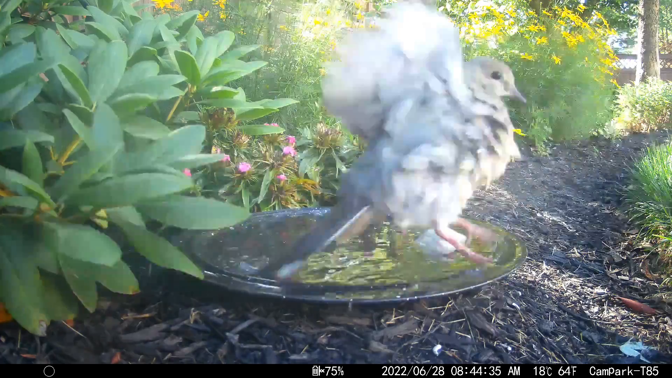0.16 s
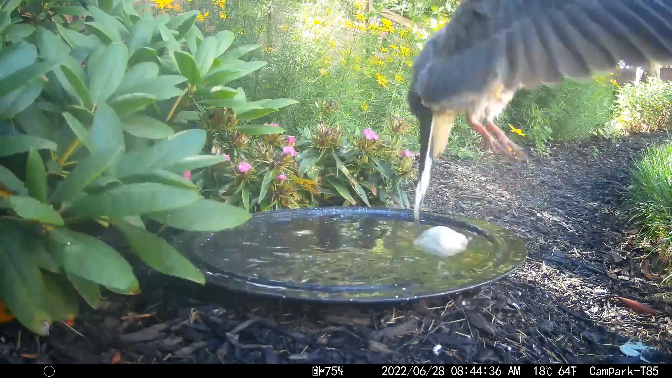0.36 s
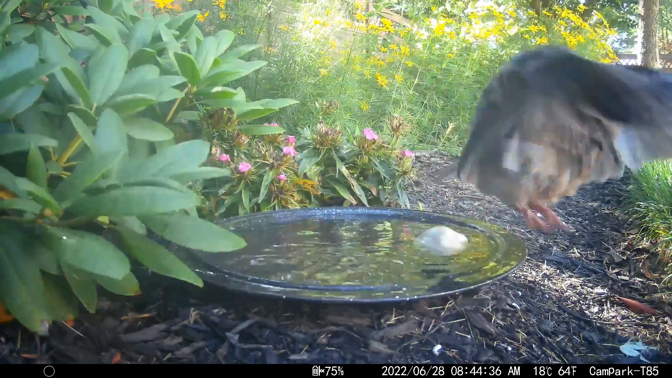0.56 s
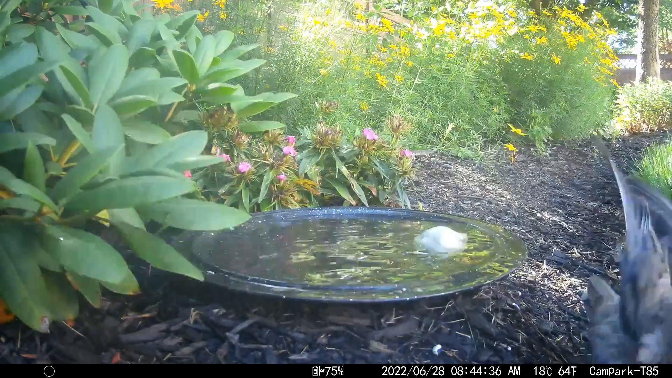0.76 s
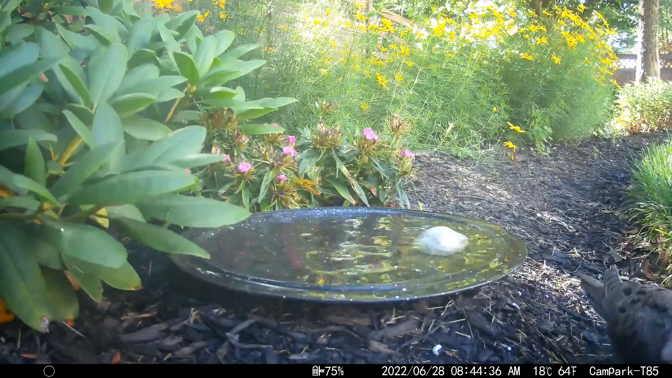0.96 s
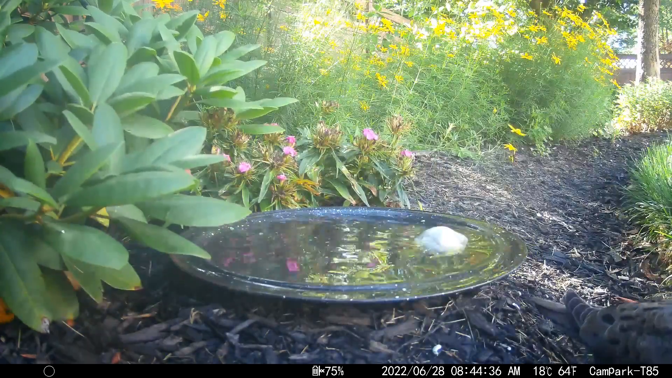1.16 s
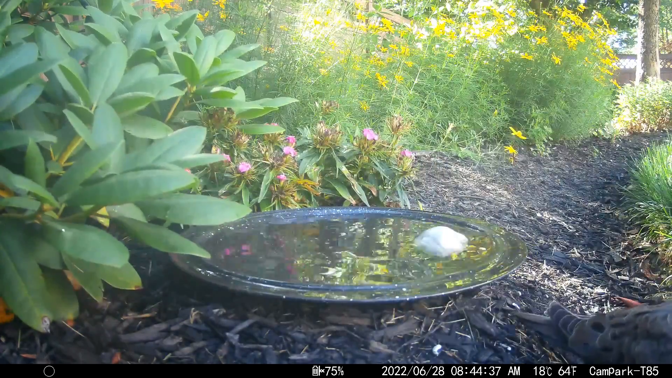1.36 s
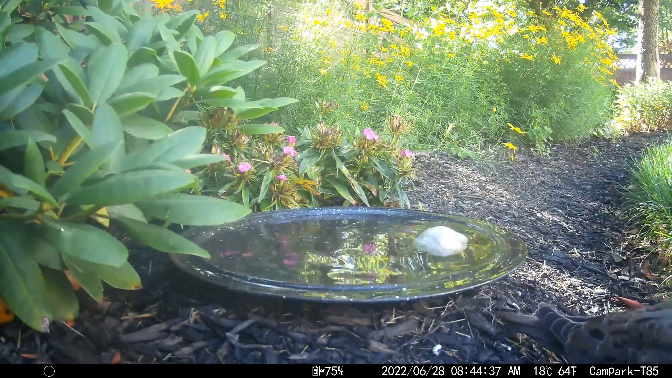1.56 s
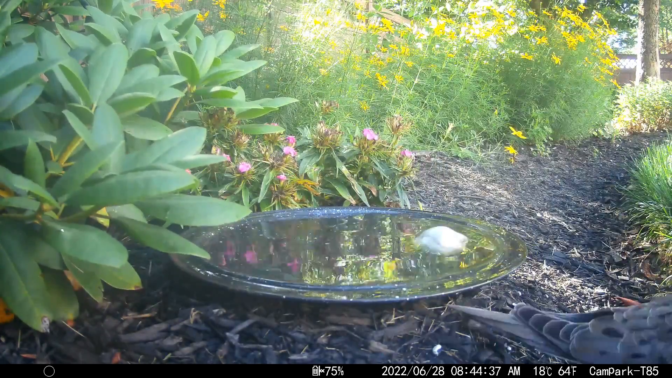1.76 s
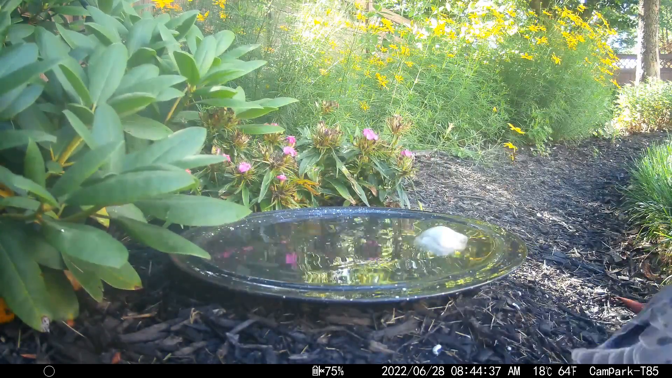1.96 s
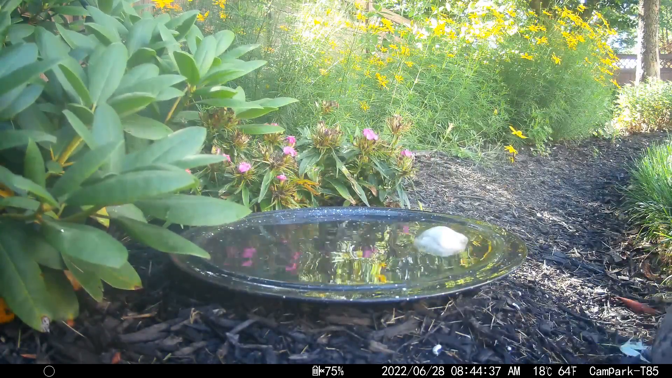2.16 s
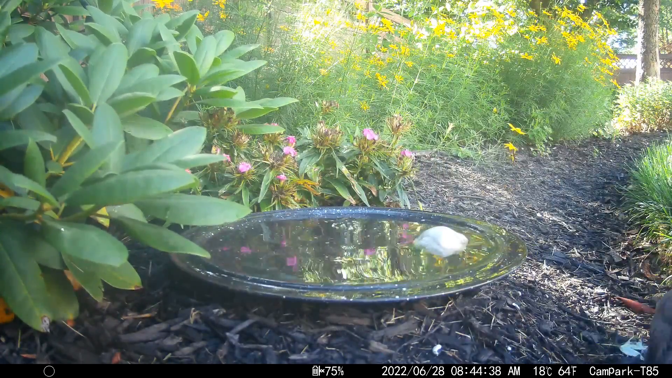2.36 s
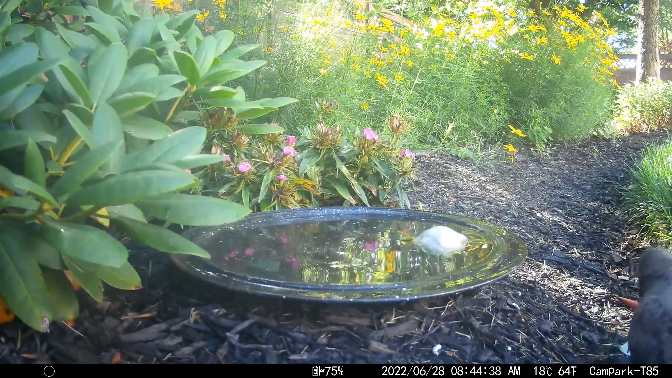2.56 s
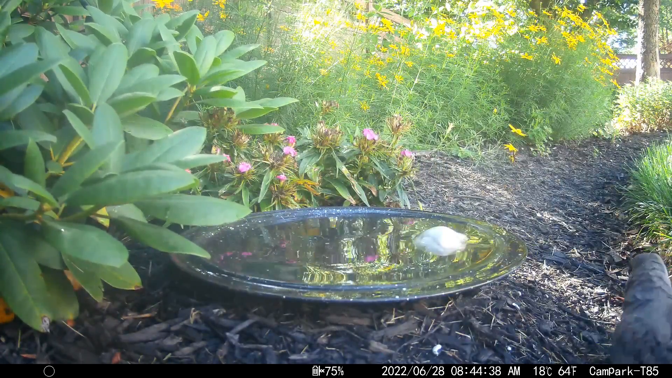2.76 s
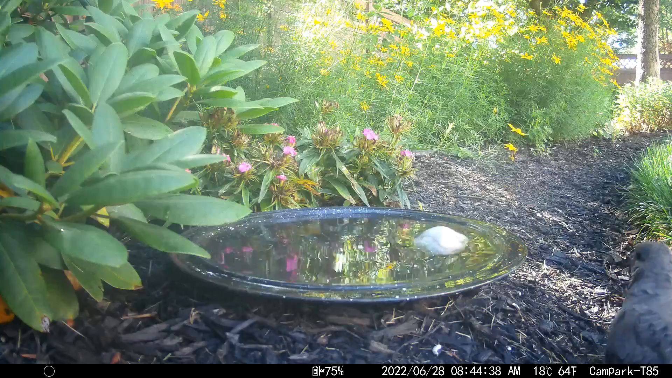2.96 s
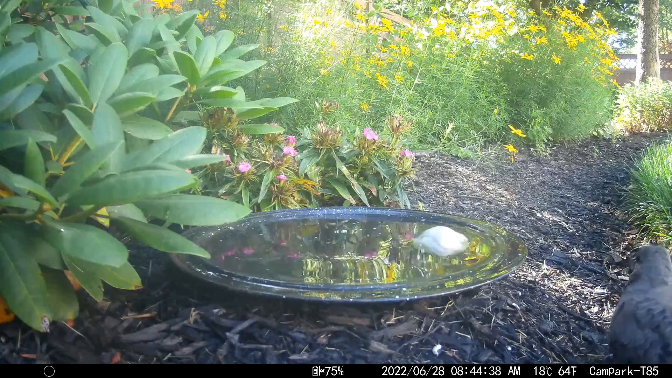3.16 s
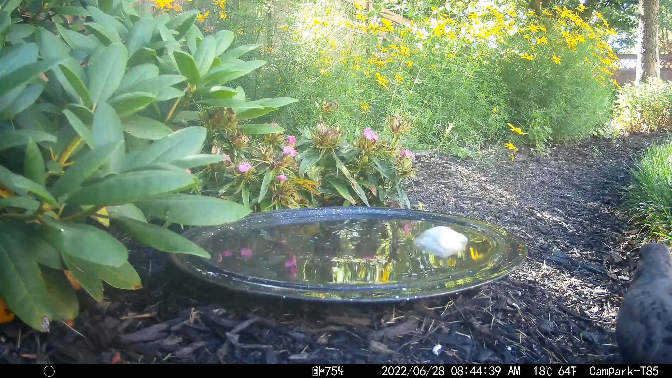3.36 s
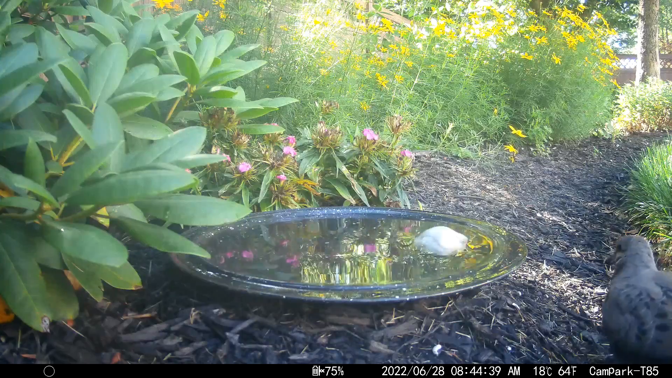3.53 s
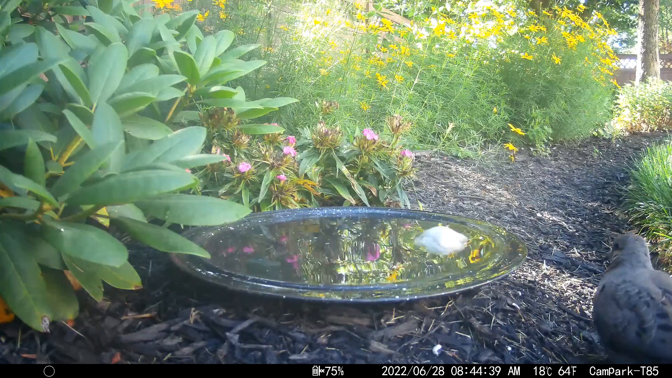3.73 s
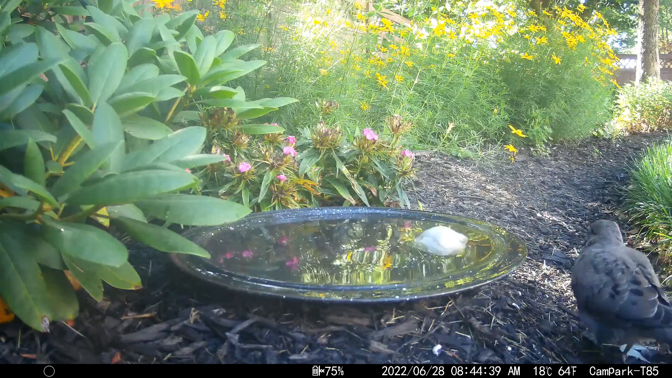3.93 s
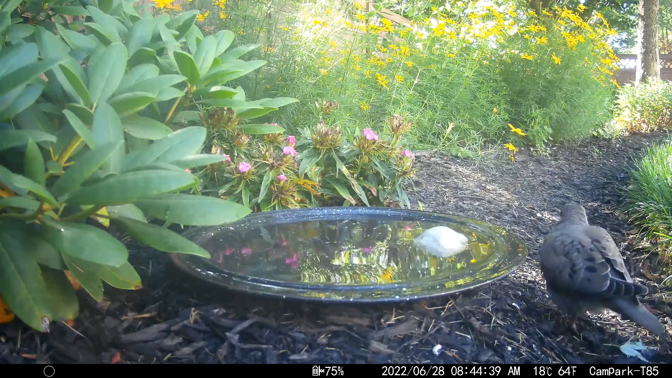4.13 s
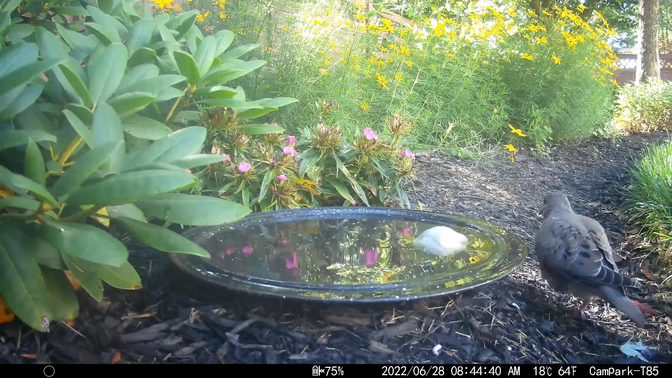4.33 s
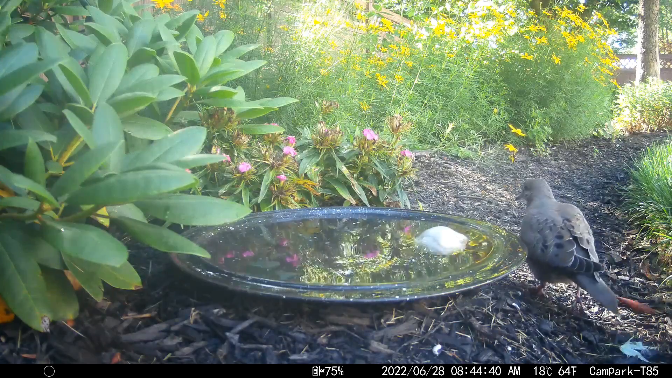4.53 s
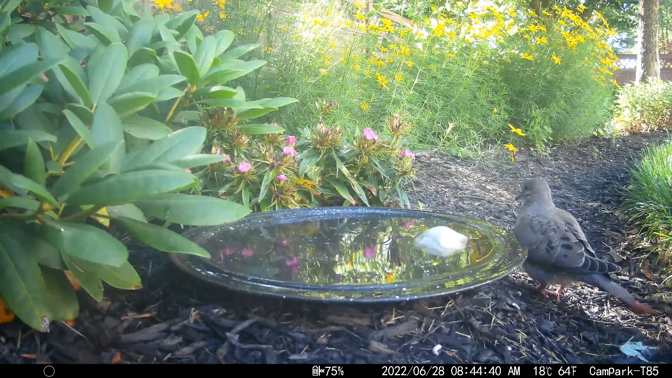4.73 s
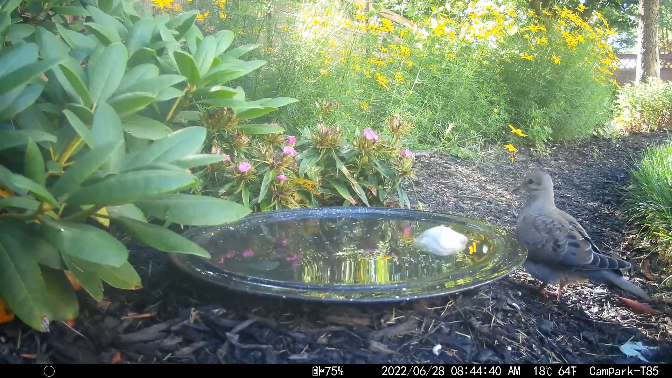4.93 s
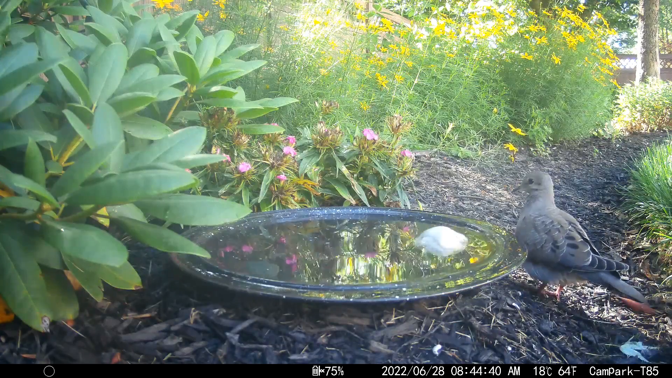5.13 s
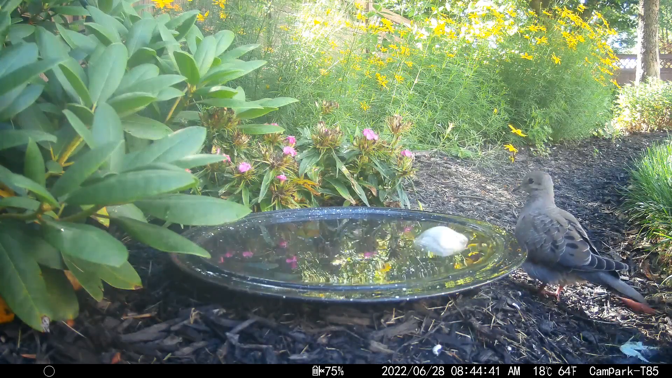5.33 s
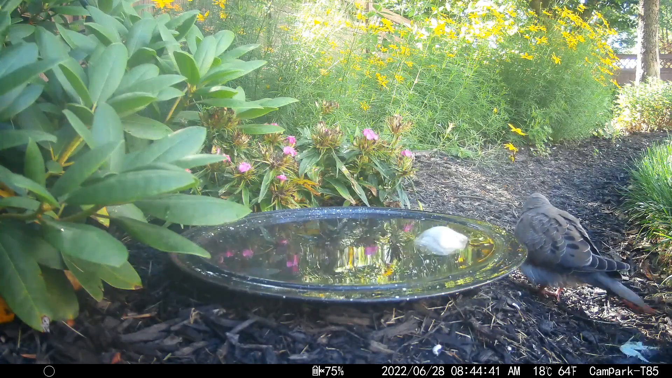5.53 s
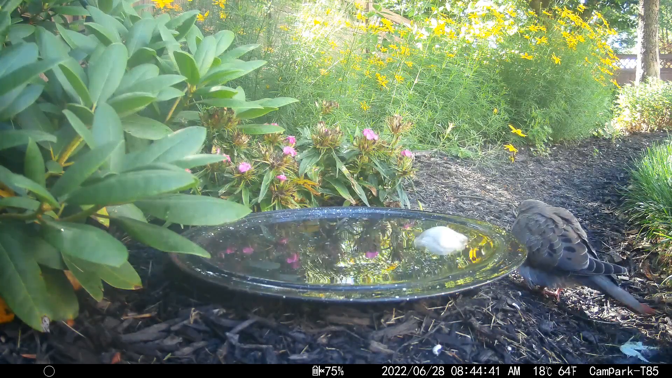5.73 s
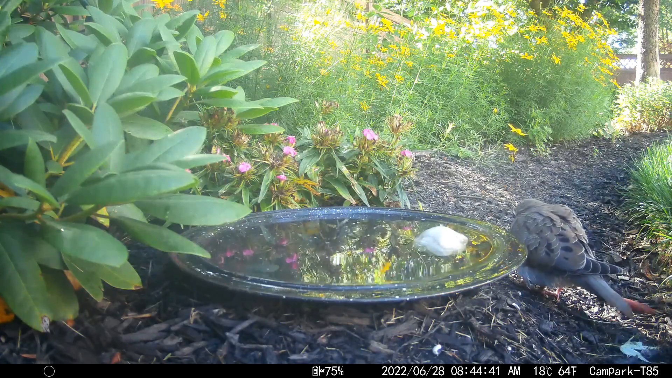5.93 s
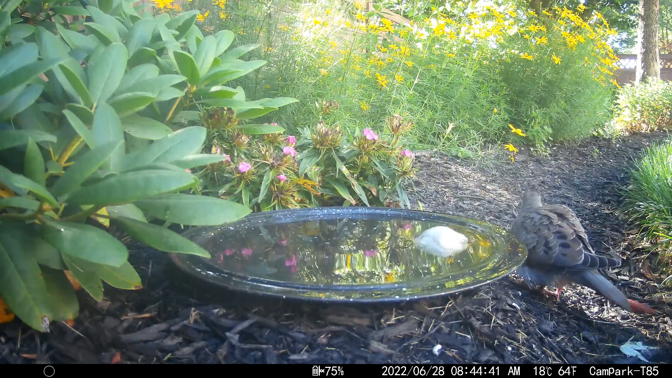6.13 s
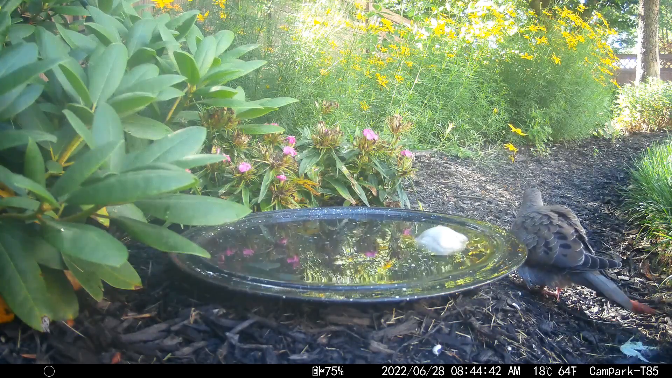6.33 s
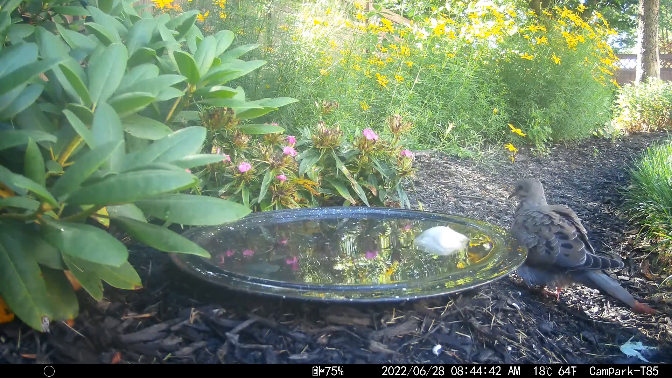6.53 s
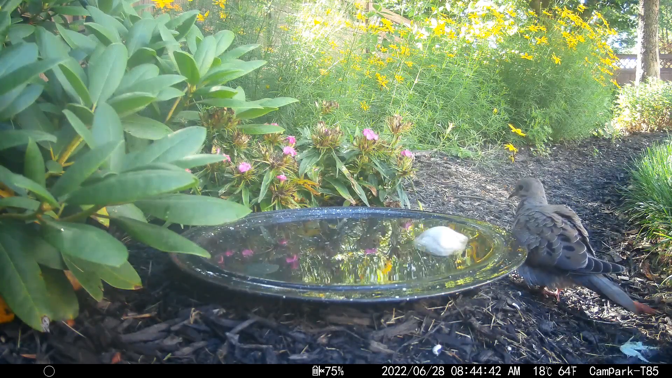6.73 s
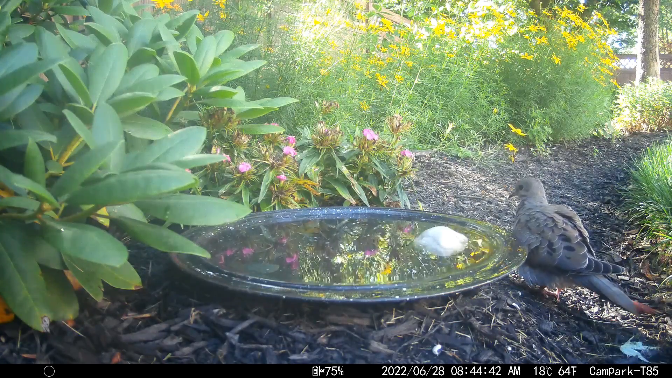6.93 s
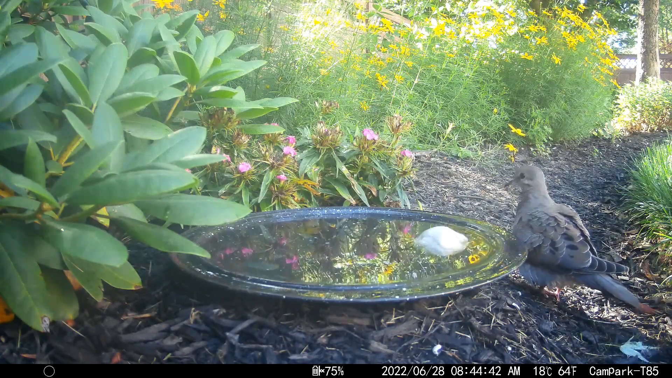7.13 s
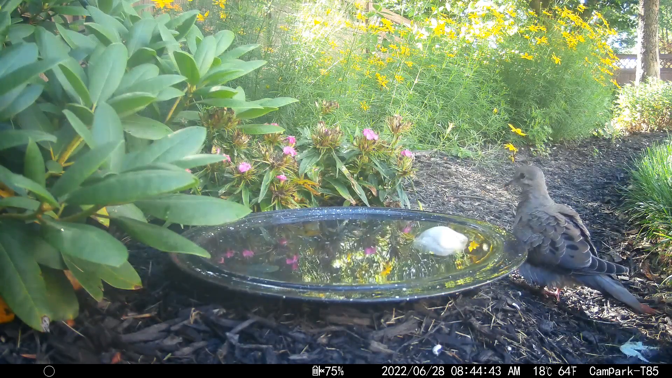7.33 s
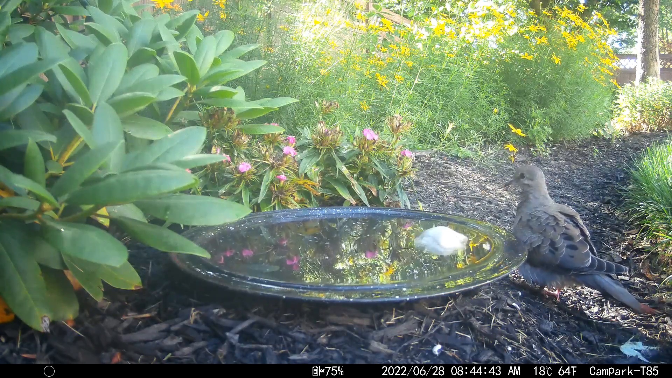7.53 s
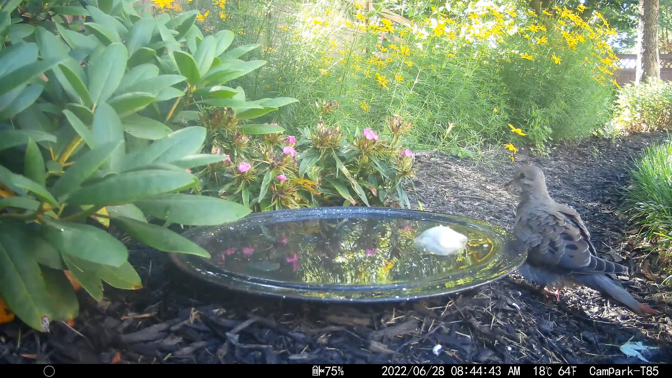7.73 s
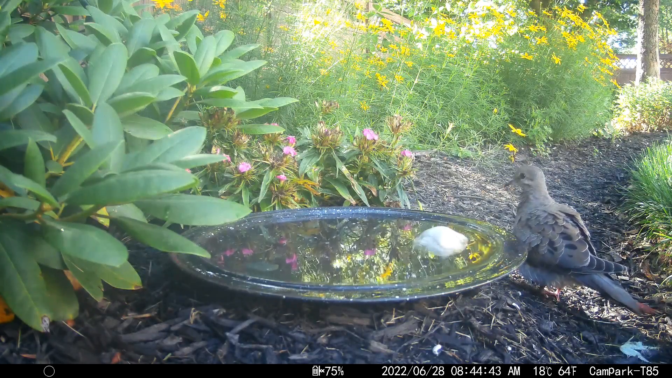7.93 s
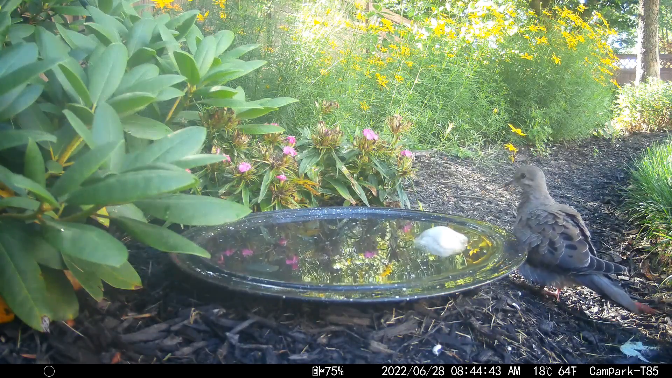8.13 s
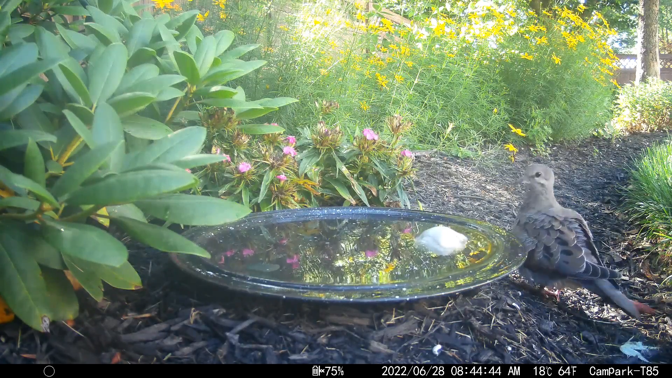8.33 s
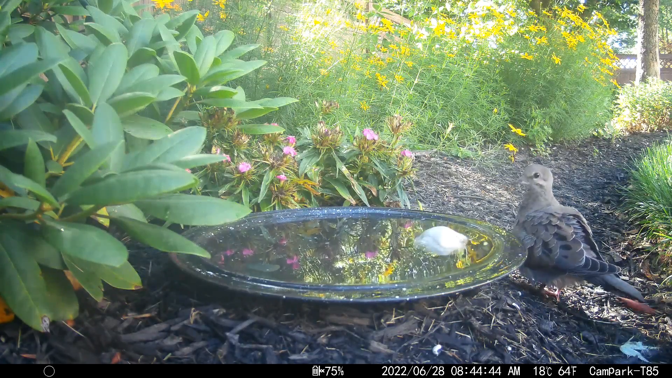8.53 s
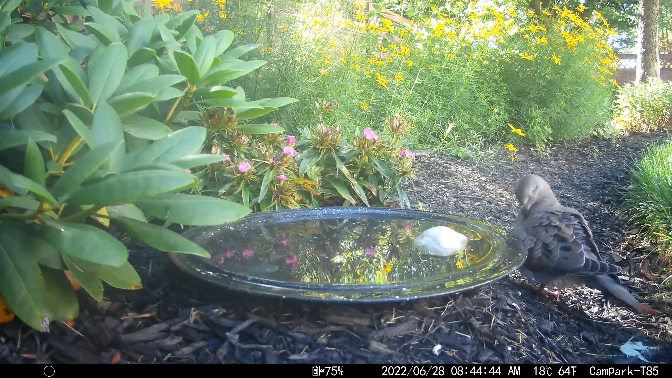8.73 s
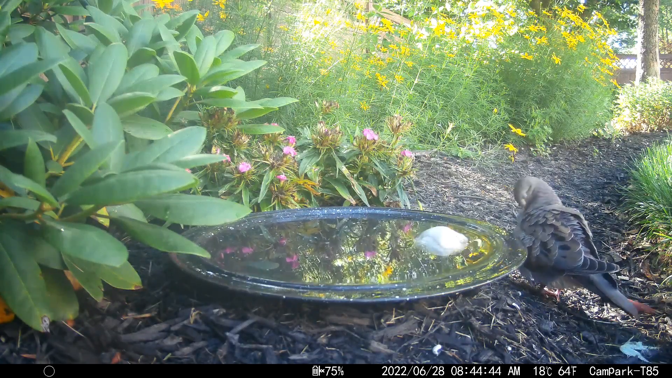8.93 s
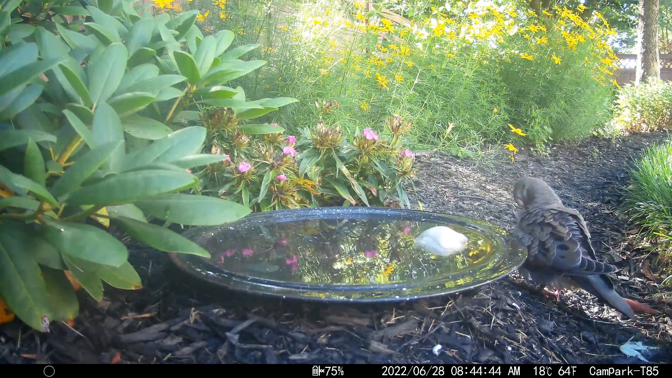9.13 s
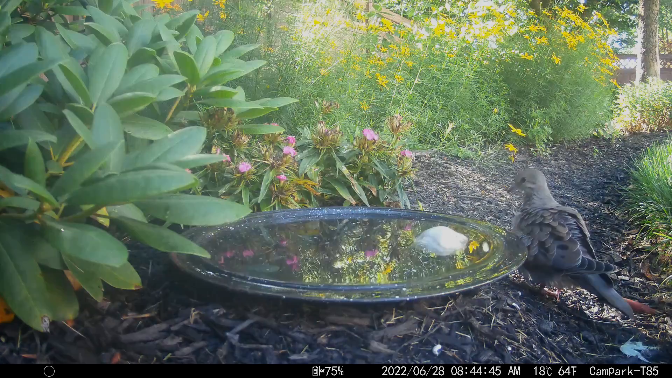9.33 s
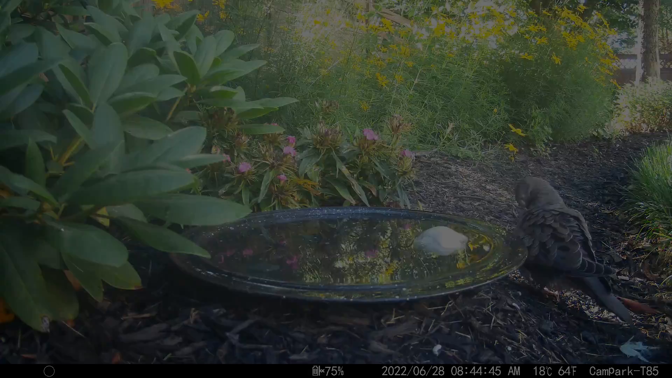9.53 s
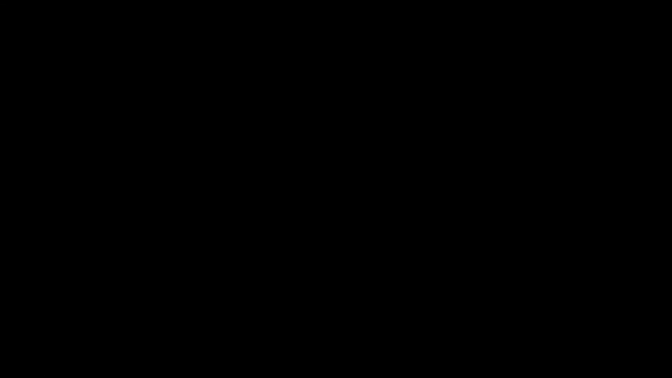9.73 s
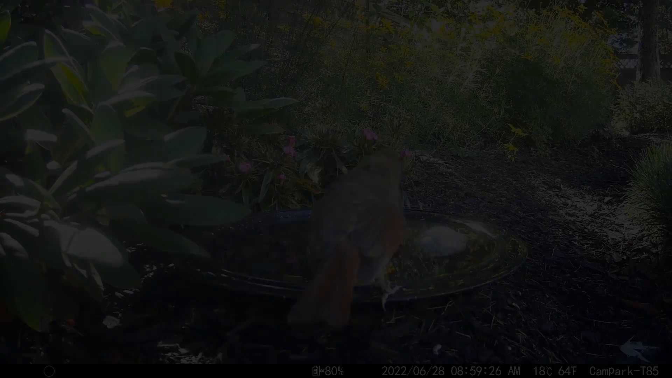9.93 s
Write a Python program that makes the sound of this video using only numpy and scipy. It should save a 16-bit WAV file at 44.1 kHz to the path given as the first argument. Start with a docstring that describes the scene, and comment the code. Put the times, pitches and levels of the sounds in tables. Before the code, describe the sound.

Outdoors, close to a small microphone, wings flap violently, overwhelming it with low air thuds and flaring feather noise, then stop within a second. The calm after is very much quieter: soft distant traffic and hiss, short bright sparrow chirps, small hoarse calls with garden echo, a faint even trill of falling notes and a little dry rustling, before the background momentarily cuts out and returns slightly louder.

```python
"""A garden bird bath: a dove bursts into flight close by, its wing beats buffeting the microphone as low and
high swirls of air, its feathers rustling as flaring noise and whistling as short falling tones. Then sparrows
chirp near and far as gliding tones with echoes, a songbird trills in falling slides, and something rustles and
ticks drily. Shaped noise makes the traffic rumble and microphone hiss, with a faint wavering tone; near the end
the sound drops out for a moment and the background comes back a little louder."""
import sys
import numpy as np
from scipy import signal
from scipy.fft import rfft, irfft, next_fast_len
from scipy.io import wavfile
from scipy.ndimage import uniform_filter1d

SR = 44100
rng = np.random.default_rng(int(sys.argv[2]) if len(sys.argv) > 2 else 0)


def materialize(psi):
    """Save the field psi as 16-bit PCM at rate SR to the path in sys.argv[1].

    A 1-D psi becomes a single channel; in a 2-D psi each row is a channel.
    """
    bounded = np.clip(np.atleast_2d(psi).T, -1, 1)
    quanta = np.round(bounded * 32767).astype(np.int16)
    wavfile.write(sys.argv[1], SR, quanta)


N = 440118  # samples

# eddies of air from the wings that strike the microphone: centre_s, peak_db, swirl_hz, wake_db (against the peak)
EDDIES = [(.045, -33.5, 25.52, -14.5), (.14, -28.5, 27.92, -16.5), (.16, -35.5, 400, -15),
          (.232, -23, 162.2, -5), (.264, -5, 232.9, -7), (.269, -1, 540, -20), (0.2716, -8.5, 1250, -20),
          (.274, -12, 750, -20), (.279, -8.5, 116.1, -16), (.342, -11.5, 482, -20.5),
          (.344, -8.5, 75, -10.5), (.361, -12, 100.6, -16), (.406, -16, 325.9, -21),
          (.417, -7.5, 151.7, -4.5), (.451, -16.5, 54.56, -7), (.54, -29.5, 40, -1.5),
          (.626, -25, 170.3, 1.5), (.66, -25, 25.04, -12.5), (.723, -14, 129.9, -7.5),
          (.731, -13.5, 300, -8.5), (.749, -9, 360, -5.5), (.755, -13, 200, -8.5), (.863, -44, 70, -6)]
# small whirls shed by the eddies: freq_hz, level_db (per Hz)
CHURN_SPECTRUM = [(60, -19.5), (200, 3.5), (500, -9.5), (1000, -24.5), (2500, -43.5)]
# course of the flight: time_s, draught_db, feather_hiss_db
FLIGHT = [(0, -57.5, -64.5), (.1, -46.5, -64), (.2, -38, -57.5), (.3, -30, -51), (.45, -35.5, -56),
          (.6, -36, -62.5), (.7, -34.5, -56.5), (.82, -41.5, -58.5), (.92, -46.5, -70), (1.1, -59.5, -84)]
# draught on the microphone: freq_hz, level_db (per Hz)
DRAUGHT_SPECTRUM = [(15, -10), (30, 1.5), (100, -9.5), (300, -23.5), (700, -36), (2000, -59)]
# feathers sliding over each other in a stroke: time_s, level_db (before a shared trim), fade_ms (time to fall 13 dB)
STROKES = [(0.0491, -36.5, 14.54), (0.1274, -42.5, 22.67), (0.1551, -33.5, 8.494), (.204, -41, 9.1),
           (0.2173, -34.5, 15.08), (.2408, -33.5, 8), (.2574, -38.5, 12), (0.2709, -25, 11),
           (.2844, -25.5, 12), (.3385, -34, 13.08), (0.349, -34, 16.82), (0.4239, -36.5, 19.21),
           (.528, -43, 14.38), (0.544, -46, 21.44), (0.6317, -43.5, 18.46), (0.6642, -47, 12.56)]
# feather noise: freq_hz, level_db (per Hz)
FEATHER_SPECTRUM = [(500, -12.5), (1000, -0.5), (2000, -2.5), (4000, -4.5), (9000, -9), (15600, -16)]
# wing whistles: start_s, start_hz, level_db (before the trims of the glide)
WING_WHISTLES = [(0.282, 2080, -42), (.283, 4210, -45), (.638, 1992, -57), (.726, 2132, -55)]
# arched sparrow chirp, timed from its top: time_s, pitch_hz, level_db (against the chirp's level)
CHIRP = [(-.046, 2202, -44), (-.025, 2656, -24), (-.014, 3986, -10), (-.006, 4003, -14), (0, 4279, -3),
         (.011, 2810, -8), (.018, 3150, -5.5), (.023, 2396, -20.5), (.028, 3040, -0.5), (.043, 2903, 1),
         (.047, 2665, -10.5), (.051, 2970, -1.5), (.057, 2356, -5), (.065, 2653, -12.5), (0.071, 2152, -13)]
# zigzag sparrow chirp, timed from its first top: time_s, pitch_hz, level_db (against the chirp's level)
WARBLE = [(-.05, 2015, -44), (-.024, 2700, -11), (0, 4811, 0.5), (.008, 3420, 0.5), (.015, 4490, 1.5),
          (.021, 2910, -5), (.046, 3585, -1), (.051, 2891, -2), (.057, 3944, -0.5), (.063, 2590, -7.5),
          (.075, 2910, -11)]
# near sparrows: time_s, level_db, overtone_offset_db, slap_delay_s, slap_db (against the chirp), contour
SPARROW_CHIRPS = [(2.475, -37.5, 1, 0.0832, -32, CHIRP), (4.299, -55.5, 10.5, 0.11885, -15.5, WARBLE),
                  (6.059, -35.5, -2.5, 0.086, -39, CHIRP)]
# overtones 2 and 3 of a chirp, before the offset and the push from a weak main tone: level_db
OVERTONES_DB = [-30.5, -35]
# breath in a chirp: freq_hz, level_db (per Hz)
BREATH_SPECTRUM = [(1500, -12), (3500, 0), (6000, -1.5), (9000, -13), (13000, -17), (15000, -28.5)]
# what the slap from a wall keeps: freq_hz, gain_db
WALL_SPECTRUM = [(2500, -27), (3600, -5), (4200, -5.5), (9000, -1.5)]
# one slide of the trill falls fast, lingers, then falls again: time_s, pitch_hz, level_db (against the trill)
SLIDE = [(0, 6970, -3), (.026, 5593, -0.5), (.045, 5250, -1), (.077, 3745, -1.5)]
# far sparrows: start_s, high_part_s, length_s, high_hz (middle of its fall), end_hz, high_db, low_db
FAR_CHIRPS = [(0.803, 0.024, 0.0816, 4936, 2900, -56.5, -63),
              (1.157, 0.04249, 0.114, 3860, 2975, -60.5, -61),
              (2.775, 0.02038, 0.07352, 4493, 3055, -62.5, -69), (2.9, .075, .12, 3790, 3191, -73, -75.5),
              (8.665, .035, 0.14993, 4161, 3045, -58.5, -60.5), (8.912, .015, .11, 4615, 3633, -63, -67)]
# contours of small far calls: length_s, start_hz, middle_hz, end_hz, hoarseness (0-1)
PIP = (.022, 4300, 4250, 4200, .1)
ARCH = (.052, 1700, 2000, 1561.8, 0.09887)
CHURR = (0.04381, 2500, 2600, 2400, 0.7935)
RISE = (.045, 3100, 3400, 3950, .5)
# when each kind of far call sounds: start_s, level_db (of its middle)
PIP_CALLS = [(1.693, -72), (1.778, -69), (1.858, -69)]
ARCH_CALLS = [(3.81, -73.5), (4.5, -69.5), (5.92, -74), (7.17, -71), (9.26, -67.5)]
CHURR_CALLS = [(8.625, -69), (8.972, -72)]
RISE_CALLS = [(3.265, -73), (3.435, -75.5)]
# a soft dry rustle, as of a bird preening nearby: start_s, length_s, level_db
RUSTLES = [(6.42, .43, -67.5), (7.269, 0.66576, -66)]
# bands of the rustle: freq_hz, level_db (per Hz)
RUSTLE_SPECTRUM = [(1500, -13.5), (2500, -1), (4000, -5.5), (5600, -4.5), (6600, 0.5), (7600, -7.5),
                   (9000, -6), (15000, -25)]
# small dry ticks: start_s, level_db (before damping), ring_hz
TICKS = [(4.779, -35, 12470), (4.78, -51.5, 1400), (4.935, -50.5, 852.1)]
# background up to the drop-out: freq_hz, level_db (per Hz)
GARDEN_SPECTRUM = [(8.8, -40), (15, -10.5), (38, 0), (88, 1), (237, -10), (308, -13.5), (984, -30),
                   (1110, -29.5), (2640, -33), (13500, -34.5), (15600, -38.5)]
# background after the drop-out: freq_hz, level_db (per Hz)
AFTER_SPECTRUM = [(8.8, -47), (15, -13.5), (91, -3), (291, -13), (326, -9), (1240, -36), (15600, -41.5)]
# faint far tone: time_s, level_db
HUM = [(0, -86.5), (8.8, -85), (9.2, -74), (9.8, -78)]
# brief drop-out: time_s, gain_db
DROPOUT = [(9.817, 3), (9.822, -35), (9.855, -27), (9.866, -20), (9.87, 0)]

EDDY_S, EDDY_CYCLES = .0009, 1.7  # half an eddy lasts a moment plus so many turns of its swirl
# low eddies trail each one, every one weaker than the last; their pitch is at most that of the eddy they
# trail or a cap, and is then spread at random (in log pitch)
WAKE_COUNT, WAKE_GAP_S, WAKE_FADE_DB, WAKE_CAP_HZ, WAKE_SPREAD = 4, .011, -5, 125.76, .61
WHISTLE_S, WHISTLE_FALL, WHISTLE_HOARSE = .018, .82, .23
TRILL_COUNT, TRILL_START_S, TRILL_GAP_S, TRILL_SLOWING_S = 17, 6.196, .1715, .00019
# the trill swells towards a peak and sags away from it
TRILL_DB, TRILL_PEAK_S, TRILL_SAG_DB_PER_S, TRILL_UNEVEN_DB = -66, 7.635, 2.5, .0252
# a far sparrow's voice flips down, then sags
FAR_FLIP_S, FAR_FLIP_HZ, FAR_SAG_S, FAR_LOW_HZ, FAR_HOARSE = .0050177, 3650, .025285, 3101.4, .8454
RUSTLE_EDGE = .38  # share of a rustle spent rising and fading
GARDEN_DB, AFTER_DB, HUM_HZ = -52.5, -47, 1122.4
BAND_LIMIT_HZ = 15740


def amp(db):
    """Turns dB into a linear gain."""
    return 10 ** (np.asarray(db) / 20)


def unit(x):
    """Scales to rms 1."""
    return x / np.sqrt(np.mean(x ** 2) + 1e-20)


def add(mix, s, sound):
    """Mixes a sound in from second s on."""
    part = mix[max(round(s * SR), 0):][:len(sound)]
    part += sound[:len(part)]


def follow(rows, column=1):
    """One column of a table drawn from its first to its last time."""
    rows = np.asarray(rows)
    return np.interp(np.arange(rows[0, 0], rows[-1, 0], 1 / SR), rows[:, 0], rows[:, column])


def colour(x, spectrum):
    """Shapes x by a (Hz, dB) spectrum, rms 1."""
    size = next_fast_len(len(x))
    hz, db = np.transpose(spectrum)
    log_hz = np.log(np.fft.rfftfreq(size, 1 / SR) + 1)
    gain = amp(np.interp(log_hz, np.log(hz + 1), db))
    return unit(irfft(rfft(x, size) * gain, size)[:len(x)])


def wander(size, span_s):
    """Smooth random drift of rms 1 that changes over span_s."""
    width = max(round(span_s * SR), 1)
    noise = rng.standard_normal(size + 4 * width)
    smooth = uniform_filter1d(uniform_filter1d(noise, width), width)
    return unit(smooth)[2 * width:][:size]


def echoes(x, t60, gap_s):
    """Leaves and fences scatter the sound back as a dense dying tail of energy 1."""
    t = np.arange(round(min(t60, .5) * SR)) / SR
    tail = rng.standard_normal(len(t)) * amp(-60 * t / t60) * (t > gap_s)
    return signal.fftconvolve(x, tail / np.linalg.norm(tail))


def whistle(rows, overtones_db=(), rough_db=2.5, waver=.012):
    """A bird tone that follows rows of (s, Hz, dB); pitch and strength tremble."""
    hz, db = follow(rows), follow(rows, column=2)
    size = len(hz)
    turns = np.cumsum(hz * (1 + waver * wander(size, .00074))) / SR
    tone = amp(db) * np.sin(2 * np.pi * turns)
    for multiple, over_db in enumerate(overtones_db, start=2):
        # overtones are clearest while the main tone is still faint
        level = amp(over_db - .154 * db + 3.102 * wander(size, .00402))
        tone += level * np.sin(2 * np.pi * multiple * turns)
    tremble = amp(rough_db * wander(size, .002))
    return np.sqrt(2) * tone * tremble * signal.windows.tukey(size, .15)


def note(rows, hoarse, t60):
    """A gliding note; the hoarser it is, the more it trembles and blurs into its echo."""
    tone = whistle(rows, rough_db=2.8 * hoarse, waver=.085 * hoarse)
    out = amp(-11.5 + 12 * hoarse) * echoes(tone, t60, .004)
    add(out, 0, tone)
    return out


def eddy(db, hz, phase):
    """One push of air, peaked in the middle; what is pushed in flows back out."""
    half_s = EDDY_S + EDDY_CYCLES / hz
    t = np.arange(-half_s, half_s, 1 / SR)
    shape = np.exp(-abs(4.2 * t / half_s) ** 1.5)
    swirl = np.cos(2 * np.pi * (hz * t + phase)) * shape
    swirl -= shape * swirl.sum() / shape.sum()  # no net push
    return amp(db) * swirl / abs(swirl).max()


def buffeting():
    """Each eddy and its wake push the diaphragm to and fro for a cycle or two over a lumpy draught."""
    draught_db = follow(FLIGHT)
    size = len(draught_db)
    pushes = np.zeros(size)
    chances = rng.random((len(EDDIES), WAKE_COUNT + 1, 3))  # lateness, tuning, phase
    for (s, db, hz, wake_db), chance in zip(EDDIES, chances):
        train = [(s, db, hz)]
        gap_s = max(WAKE_GAP_S, .5 / hz)
        for k, (late, tune, _) in enumerate(chance[1:]):
            at = s + gap_s * (k + .5 + late)
            swirl_hz = min(hz, WAKE_CAP_HZ) * np.exp(WAKE_SPREAD * (2 * tune - 1))
            train.append((at, db + wake_db + WAKE_FADE_DB * k, swirl_hz))
        for (at, level_db, swirl_hz), phase in zip(train, chance[:, 2]):
            push = eddy(level_db, swirl_hz, phase)
            add(pushes, at - len(push) / 2 / SR, push)
    linger = np.exp(-1 / (.0068 * SR))  # the small whirls die away after each push
    stir = signal.lfilter([1 - linger], [1, -linger], abs(pushes))
    churn = amp(-13) * stir * colour(rng.standard_normal(size), CHURN_SPECTRUM)
    draught = amp(draught_db + 3 * wander(size, .015)) * colour(rng.standard_normal(size), DRAUGHT_SPECTRUM)
    return pushes + churn + draught


def feathers():
    """Feathers sliding over each other: crackly hiss that flares with every stroke over an uneven flutter."""
    hiss_db = follow(FLIGHT, column=2)
    level = amp(hiss_db + 2.4 * wander(len(hiss_db), .0065))
    for s, db, fade_ms in STROKES:
        u = np.arange(0, 3, 1000 / (fade_ms * SR))  # time in units of the fade
        flare = np.minimum(u * 6, 1) * np.exp(-1.5 * u ** 2)
        add(level, s - .002, amp(db - 10.5) * flare)
    crackle = rng.standard_normal(len(level)) * amp(2.8 * wander(len(level), .001))
    return level * colour(crackle, FEATHER_SPECTRUM)


def wing_whistles():
    """Air sings briefly through the flight feathers in short falling tones."""
    out = np.zeros(N)
    for s, hz, db in WING_WHISTLES:
        glide = [(0, hz, db - 2), (WHISTLE_S, hz * WHISTLE_FALL, db - 4)]
        add(out, s, note(glide, WHISTLE_HOARSE, .069))
    return out


def sparrow():
    """Hoarse arched or zigzag chirps, with a scatter of echoes and one faint, blurred slap from a wall."""
    out = np.zeros(N)
    for s, db, over_db, delay, slap_db, rows in SPARROW_CHIRPS:
        tone = whistle(rows, np.add(OVERTONES_DB, over_db), rough_db=2.5, waver=.0211)
        breath = colour(rng.standard_normal(len(tone)), BREATH_SPECTRUM)
        breath *= signal.windows.tukey(len(tone), .4)
        chirp = amp(db) * (tone + amp(-22) * breath)
        start = s + rows[0][0]
        add(out, start, chirp)
        add(out, start, amp(-6) * echoes(chirp, .07517, .002))
        add(out, start, amp(-27) * echoes(chirp, .36, .01995))
        slap = colour(echoes(chirp, .0387, 0), WALL_SPECTRUM)
        add(out, start + delay, amp(db + slap_db) * slap)
    return out


def songbird():
    """An even trill of falling slides, slowing a little, from a tree further off."""
    out = np.zeros(N)
    k = np.arange(TRILL_COUNT)
    for s in TRILL_START_S + TRILL_GAP_S * k + TRILL_SLOWING_S * k ** 2:
        db = TRILL_DB - TRILL_SAG_DB_PER_S * abs(s - TRILL_PEAK_S)
        db += TRILL_UNEVEN_DB * rng.standard_normal()
        slide = amp(db) * whistle(SLIDE, rough_db=3, waver=.037178)
        add(out, s, slide)
        add(out, s, amp(-8.5) * echoes(slide, .10317, .0028))
    return out


def far_birds(t60=.3693):
    """Hoarse two-step chirps and small pips, arches, churrs and rises, wet with garden echo."""
    out = np.zeros(N)
    for s, high_s, length, high_hz, end_hz, db, low_db in FAR_CHIRPS:
        flip = high_s + FAR_FLIP_S
        rows = [(0, high_hz * 1.06, db - 5), (high_s, high_hz * .94, db),
                (flip - FAR_FLIP_S / 2, FAR_FLIP_HZ * 1.08, low_db - 8), (flip, FAR_FLIP_HZ, low_db - 1.5),
                (flip + FAR_SAG_S, FAR_LOW_HZ, low_db), (length, end_hz, low_db - 8)]
        add(out, s, note(rows, FAR_HOARSE, t60))
    kinds = [(PIP, PIP_CALLS), (ARCH, ARCH_CALLS), (CHURR, CHURR_CALLS), (RISE, RISE_CALLS)]
    for (length, start_hz, mid_hz, end_hz, hoarse), calls in kinds:
        for s, db in calls:
            rows = [(0, start_hz, db - 5), (.35037 * length, mid_hz, db),
                    (.6523 * length, mid_hz, db), (length, end_hz, db - 6)]
            add(out, s, note(rows, hoarse, t60))
    return out


def rustle():
    """Dry friction as fine grains of noise with a few broad bands."""
    out = np.zeros(N)
    for s, length, db in RUSTLES:
        size = round(length * SR)
        grains = rng.standard_normal(size) * amp(2 * wander(size, .003742))
        swell = signal.windows.tukey(size, RUSTLE_EDGE)
        add(out, s, amp(db) * swell * colour(grains, RUSTLE_SPECTRUM))
    return out


def ticks():
    """Each tick is a very short damped ring."""
    out, t = np.zeros(N), np.arange(200) / SR
    for s, db, hz in TICKS:
        add(out, s, amp(db) * np.sin(2 * np.pi * hz * t) * np.exp(-t * hz * .7294))
    return out


def garden():
    """Traffic rumble and hiss as noise in drifting patches of time and pitch, and a faint wavering tone."""
    shape = (513, N // 256 + 4)  # frequency bins, time frames
    grid = rng.standard_normal(shape) + 1j * rng.standard_normal(shape)
    patches = uniform_filter1d(rng.standard_normal(shape), 70, 0)
    patches = unit(uniform_filter1d(patches, 24, 1))
    noise = signal.istft(grid * amp(1.1 * patches), SR, nperseg=1024, noverlap=768)[1][:N]
    noise *= amp(.57 * wander(N, .12))
    out = amp(GARDEN_DB) * colour(noise, GARDEN_SPECTRUM)
    back = round(DROPOUT[2][0] * SR)  # the louder background takes over within the drop-out
    out[back:] = amp(AFTER_DB) * colour(noise[back:], AFTER_SPECTRUM)
    hum_level = amp(follow(HUM))
    hum_hz = HUM_HZ + 7.7 * wander(len(hum_level), .14)
    add(out, 0, hum_level * np.sin(2 * np.pi * np.cumsum(hum_hz) / SR))
    return out


def scene():
    """Sums the dove, the other birds, the small dry sounds and the background."""
    mix = wing_whistles() + sparrow() + songbird() + far_birds() + rustle() + ticks() + garden()
    add(mix, 0, buffeting() + feathers())
    return mix[None]


def record(dry):
    """Drops the level out briefly, then cuts the treble above the band limit."""
    gain = np.ones(N)
    add(gain, DROPOUT[0][0], amp(follow(DROPOUT)) - 1)
    low_pass = signal.firwin(1023, BAND_LIMIT_HZ, window=("kaiser", 9), fs=SR)
    return signal.oaconvolve(dry * gain, low_pass[None], "same")


dry = scene()
out = record(dry)
materialize(out)
```